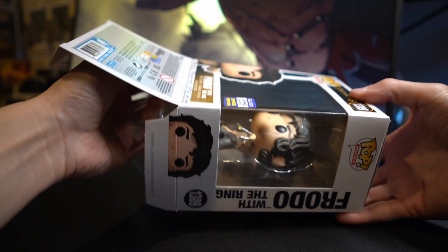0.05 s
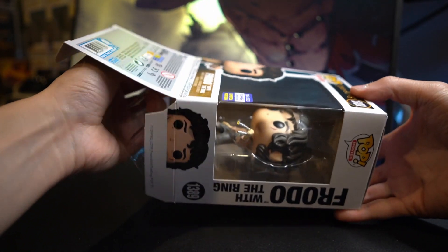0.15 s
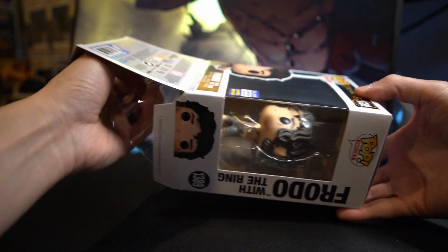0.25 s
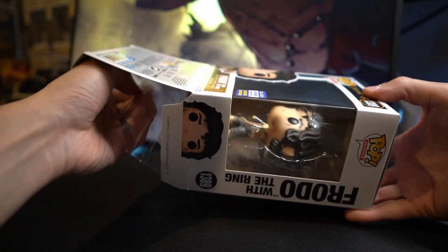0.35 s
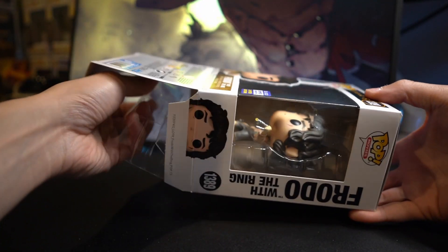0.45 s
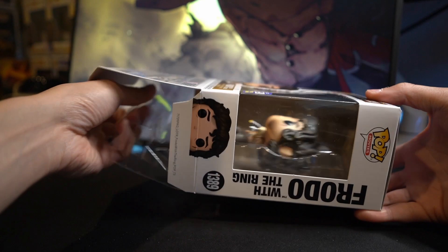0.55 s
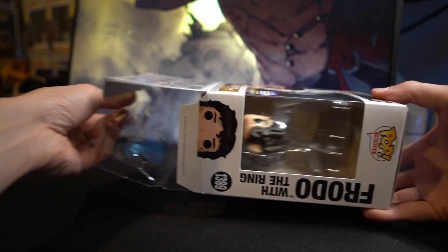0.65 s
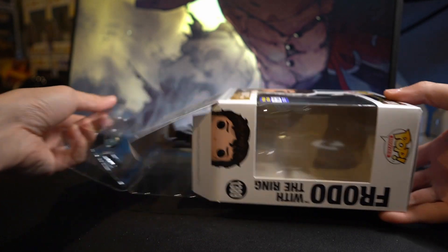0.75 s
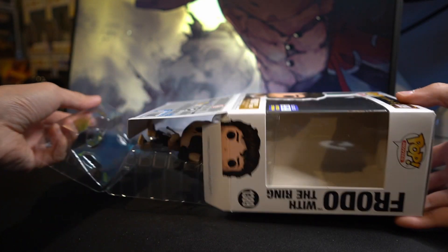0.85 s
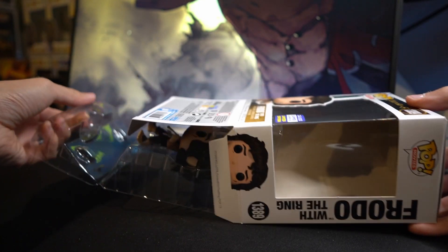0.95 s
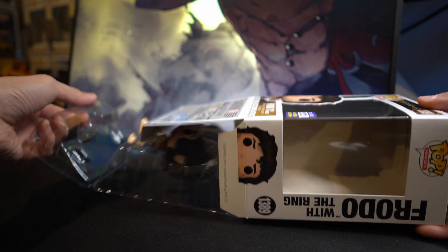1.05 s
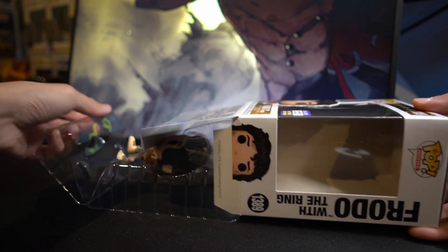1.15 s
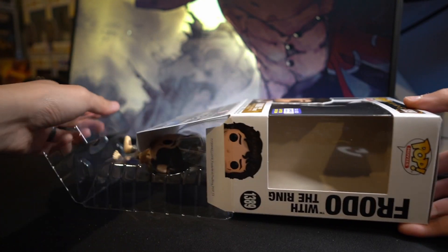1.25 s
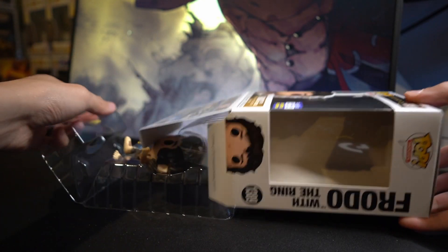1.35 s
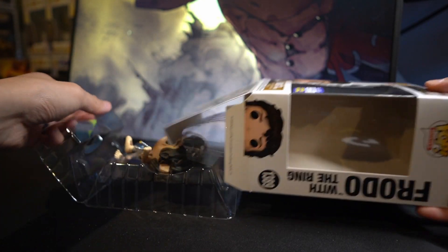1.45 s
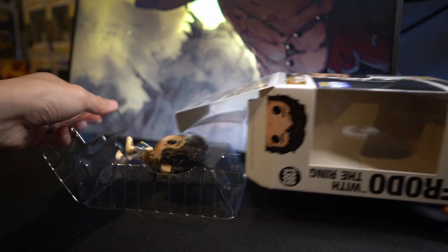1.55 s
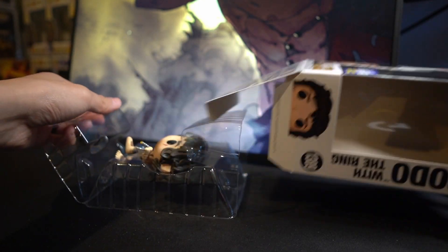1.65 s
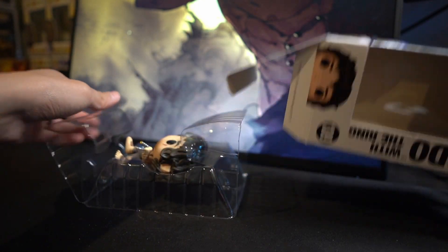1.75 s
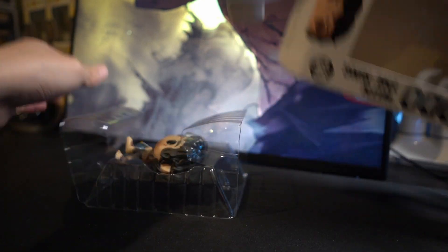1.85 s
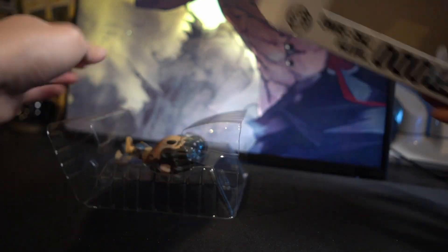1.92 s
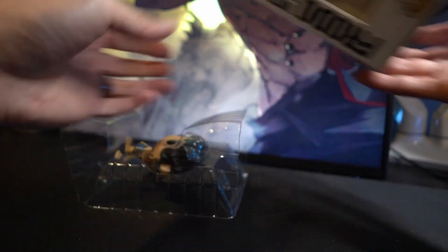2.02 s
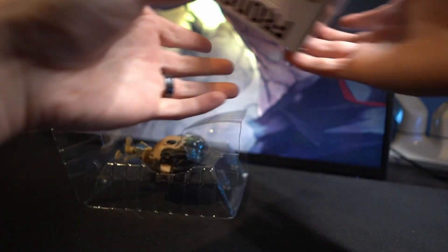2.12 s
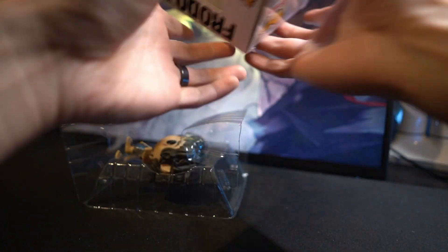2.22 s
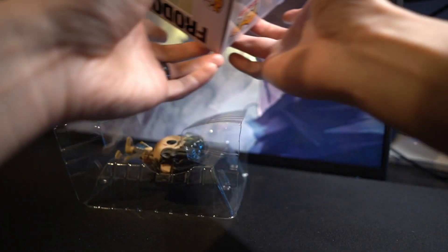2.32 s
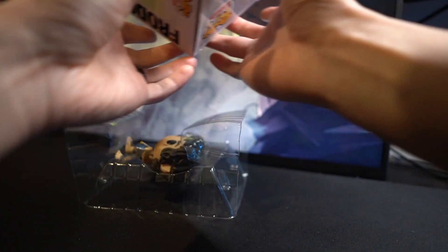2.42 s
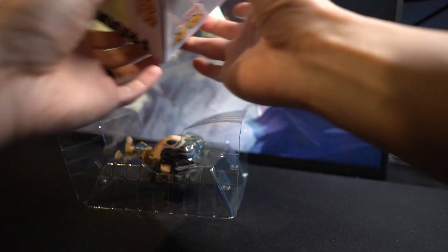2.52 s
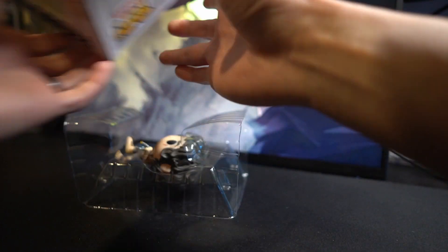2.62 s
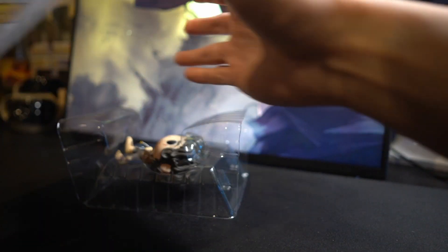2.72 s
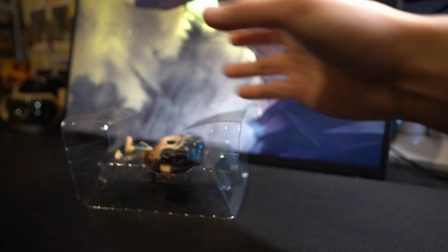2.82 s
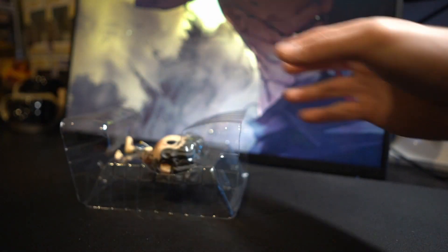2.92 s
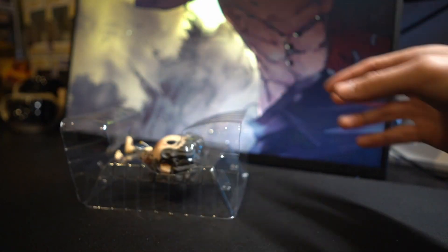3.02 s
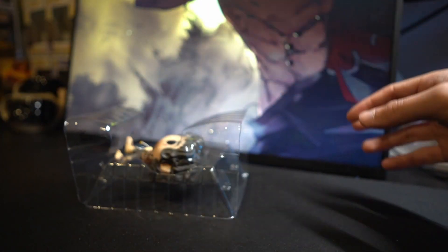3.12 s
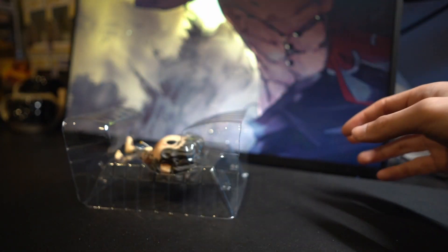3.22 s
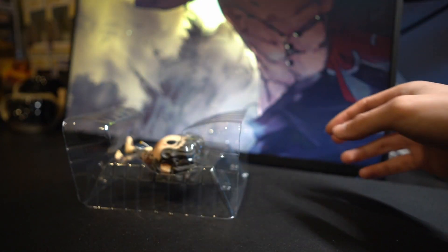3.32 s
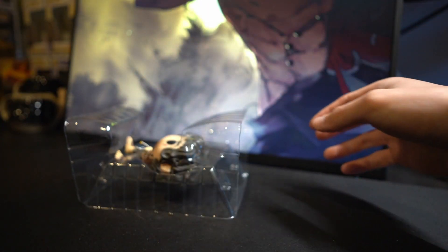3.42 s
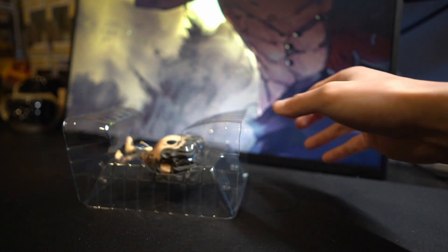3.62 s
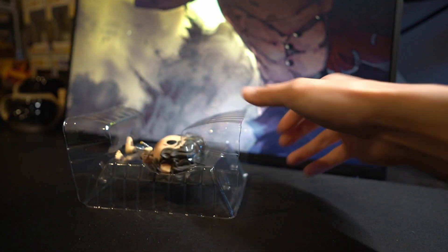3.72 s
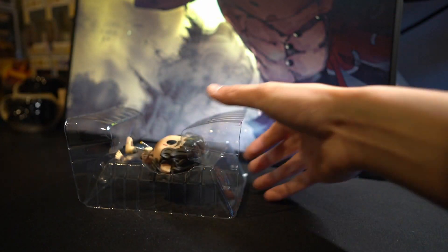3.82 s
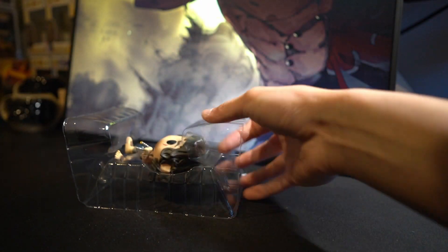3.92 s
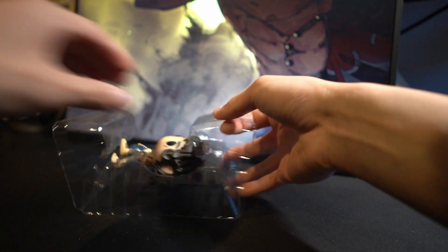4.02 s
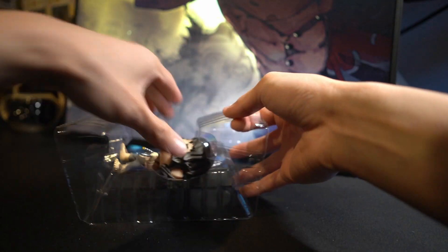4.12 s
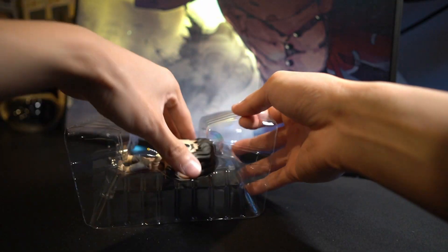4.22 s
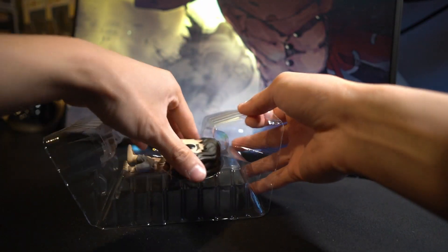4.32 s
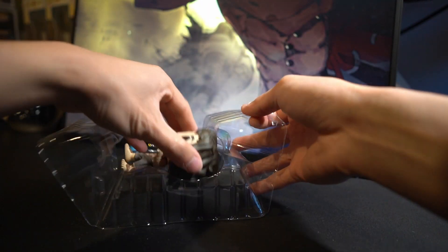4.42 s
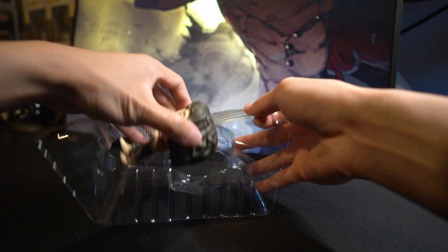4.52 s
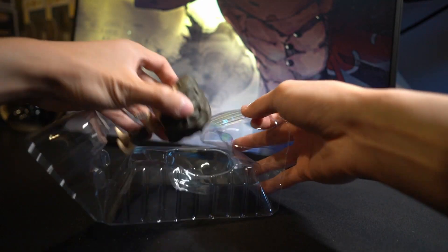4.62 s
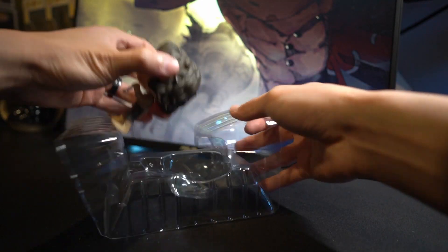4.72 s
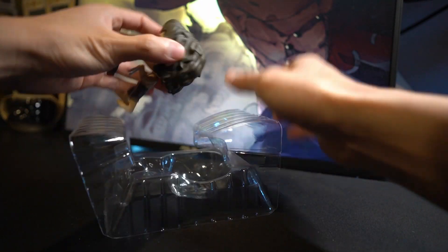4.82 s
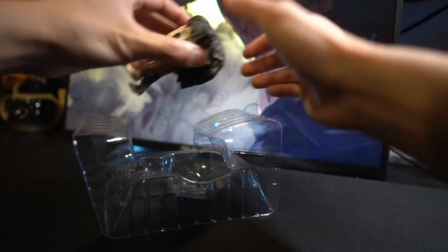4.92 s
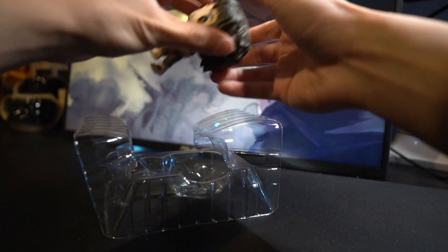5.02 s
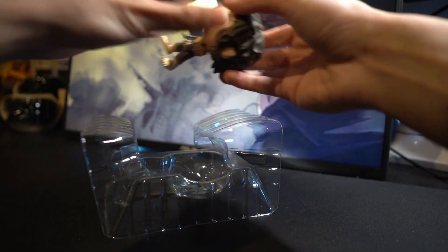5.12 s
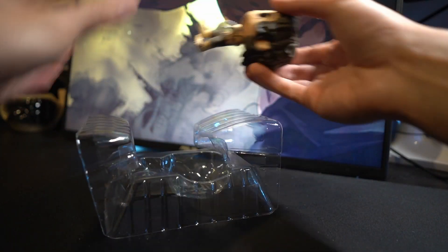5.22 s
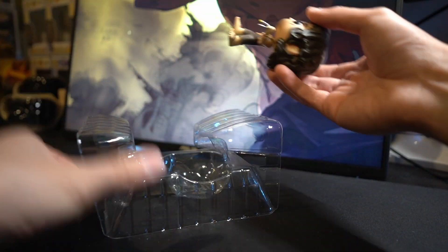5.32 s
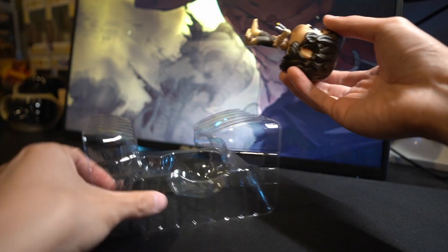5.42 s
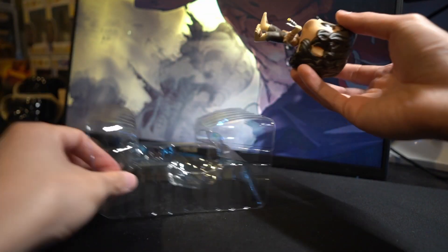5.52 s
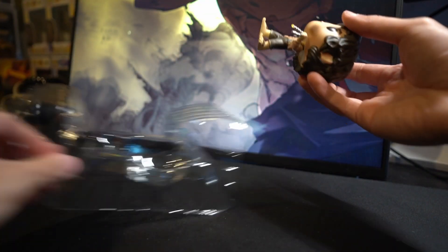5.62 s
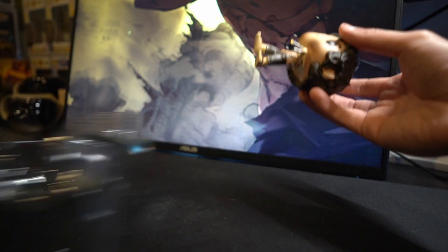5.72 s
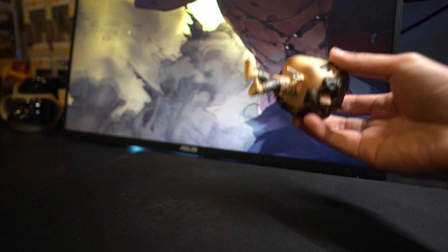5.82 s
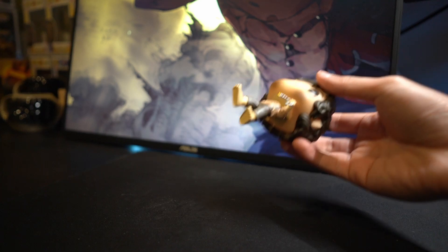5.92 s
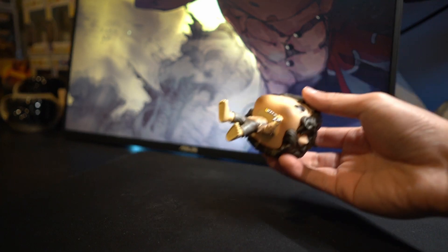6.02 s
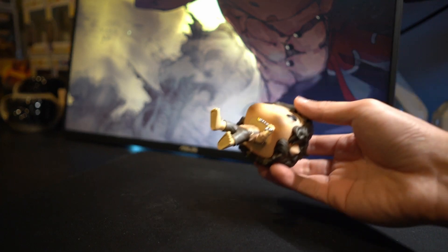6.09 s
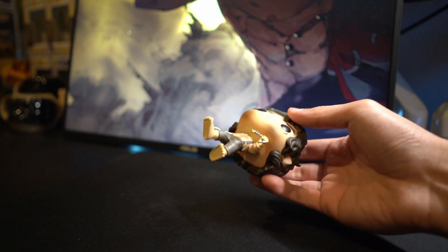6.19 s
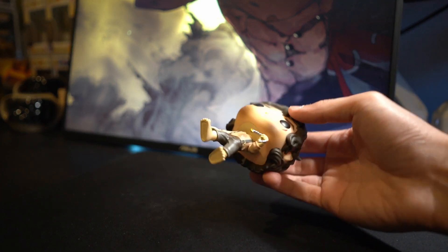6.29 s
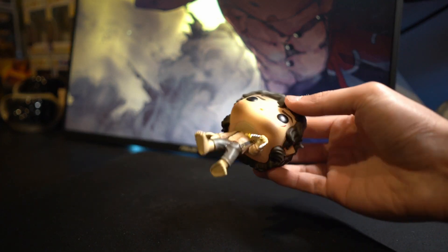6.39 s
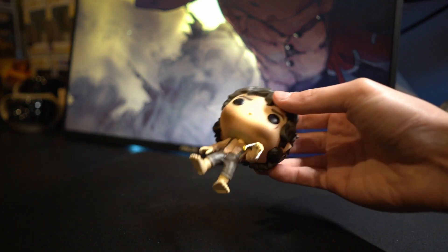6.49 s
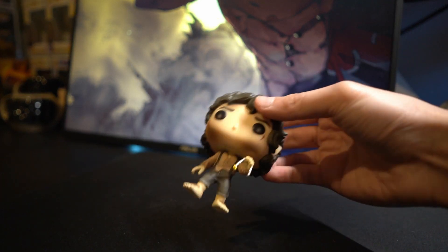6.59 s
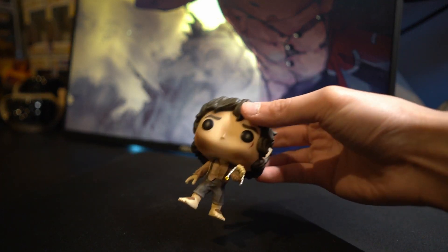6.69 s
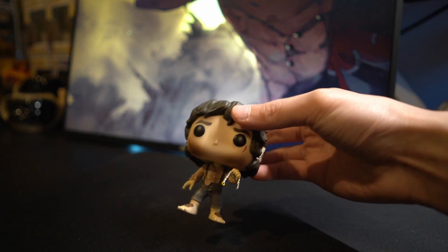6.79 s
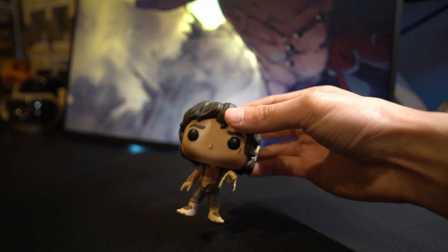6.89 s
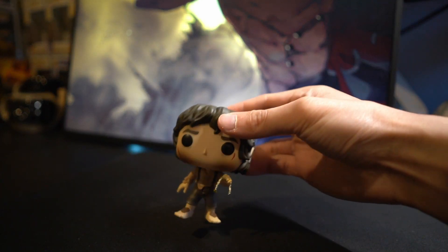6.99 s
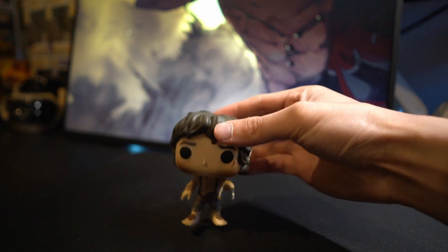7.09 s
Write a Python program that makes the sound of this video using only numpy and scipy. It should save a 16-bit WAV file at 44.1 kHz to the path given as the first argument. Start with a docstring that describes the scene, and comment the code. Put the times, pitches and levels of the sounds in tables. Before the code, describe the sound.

A thin plastic tray is pulled from a small cardboard box with sharp snaps, scraping and hollow knocks. Set on a desk, it rocks in double ticks that quicken and fade while the empty box is softly handled. Fingers squeeze the tray, crackling and popping it, remove a small figure, then the tray rocks again and is dragged off with a squeak. Near silence follows. Close microphone, left-sided, quiet small room.

```python
"""Plastic tray pulled out of a small box

A thin plastic tray is pulled out of a small cardboard box on a desk: it scrapes, snaps and crackles.
Left alone it rocks on its edges, ticking ever faster, while the hollow box is handled aside; then it is
squeezed, emptied and dragged away, and fingers turn the small figure it held. Clicks and rattles ring the
tray, box and desk; many tiny random slips make the rubbing. One close microphone, panned to the left.
"""
import sys
import numpy as np
from scipy import signal
from scipy.fft import rfft, irfft, next_fast_len
from scipy.io import wavfile

SR = 44100
rng = np.random.default_rng(int(sys.argv[2]) if len(sys.argv) > 2 else 0)


def put_to_file(sound):
    """Save the sound as 16-bit audio at rate SR, in the file named by the first command-line argument."""
    columns = np.atleast_2d(sound).T  # one column per channel
    safe = np.clip(columns, -1, 1)
    whole_steps = np.round(safe * 32767)
    wavfile.write(sys.argv[1], SR, whole_steps.astype(np.int16))


N = 315315   # samples in the scene

# All source levels are set ahead of the microphone gain. Levels of modes (the tones in which a thing
# rings) and of colours only weigh their rows against each other. Ring time is the time to fall by 60 dB.

# Tones of the tray walls. Each row: pitch in Hz, level in dB, ring time in seconds when struck.
TRAY_MODES = [(920, -4, .012), (1170, 0, .011), (1400, 0, .01), (1650, -2, .009), (1900, -3, .008),
              (2150, -3, .008), (2450, -2, .007), (2750, -4, .007), (3050, -3, .006), (3450, -1, .006),
              (3950, -1, .006), (4500, -5, .005)]
# Tones of the air and panels of the box with the tray inside. Each row: pitch in Hz, level in dB,
# ring time in seconds.
BOX_MODES = [(360, -23, .05), (330, -14.5, 0.11), (436, -9, 0.16), (522, -4.5, 0.04), (550, 4, 0.068),
             (627, -4.5, 0.09), (845, -15.5, 0.0033)]
# Tones of the desk top. Each row: pitch in Hz, level in dB, ring time in seconds when struck.
DESK_MODES = [(63.4, -14, 0.45), (112.66, 1.5, 0.12), (159, -5, 0.062), (272, -7, 0.11)]
# The tray rocks and two corners land almost together. Each row: start in seconds, first landing in dB,
# gap to the second in ms, second landing in dB.
ROCKING = [(1.875, -21.5, 5.4, -22.5), (2.0822, -23, 7, -25), (2.2789, -34, 5.54, -22),
           (2.462, -52.5, 9.1, -23.5), (2.6543, -23.5, 7.5, -46.5), (2.833, -29.5, 4.8, -32.5),
           (3.0019, -32.5, 8.8, -29.5), (3.1673, -30.5, 17, -43), (3.3144, -29.5, 6, -48),
           (3.4405, -47, 16.7, -30.5), (3.5983, -45, 8.4, -32.5), (3.7335, -35.5, 6, -52.5),
           (3.8674, -36.5, 6.4, -48), (4.998, -30, 5, -25), (5.1621, -31.5, 13, -33),
           (5.3152, -33.5, 3.8, -36)]

TRAY_OUT_S = 1.5   # from here on the tray is outside the box


def from_db(db):
    """Turn decibels into a gain."""
    return 10 ** (np.asarray(db) / 20)


def rms_one(x):
    """Scale to an average strength (rms) of 1."""
    return x / np.sqrt(np.mean(x ** 2) + 1e-20)


def in_time(rows):
    """Turn each column of a curve table into one value a sample."""
    s, *columns = np.transpose(rows)
    return [np.interp(np.arange(N) / SR, s, c) for c in columns]


def coloured(x, spectrum):
    """Filter to the given spectrum with minimum phase, so that nothing sounds early; rms 1."""
    size = next_fast_len(N + 8192)
    hz, db = np.transpose(spectrum)
    grid = np.maximum(np.fft.rfftfreq(4096, 1 / SR), 1)
    grid_db = np.interp(np.log(grid), np.log(hz), np.maximum(db, -70))
    cepstrum = irfft(np.log(from_db(grid_db)))
    # folding the second half onto the first gives minimum phase
    cepstrum[1:2048] *= 2
    cepstrum[2049:] = 0
    response = irfft(np.exp(rfft(cepstrum)))
    return rms_one(irfft(rfft(x, size) * rfft(response, size), size)[:N])


def drift(rate_hz):
    """Slow random wandering with rms 1, computed every 40 samples and joined by lines."""
    r = np.exp(-2 * np.pi * rate_hz * 40 / SR)
    noise = rng.standard_normal(N // 40 + 2002)
    slow = signal.lfilter([1], [1, -2 * r, r * r], noise)[2000:]   # skip the settling
    return np.interp(np.arange(N) / 40, np.arange(len(slow)), rms_one(slow))


def ring(force, hz, t60):
    """A resonance: a unit click sets a fading sine of about height 1 ringing."""
    r = from_db(-60 / (t60 * SR))
    w = 2 * np.pi * hz / SR
    return signal.lfilter([0, np.sin(w)], [1, -2 * r * np.cos(w), r * r], force + 1e-18)


def grains(per_s, spread_db, clump_db):
    """Random slips of uneven size and either sign, whose strength swells and sinks in clumps."""
    sizes = from_db(spread_db * np.minimum(rng.exponential(1, N), 5)) * rng.choice([-1, 1], N)
    happens = rng.random(N) < per_s / SR
    return sizes * happens * from_db(clump_db * drift(40))


def struck(times, peak_db, rattle_ms, modes, uneven_db, after, bend, tilt_db=None):
    """Each contact is a click and a rattle that swells and dies; grip shifts the modes and shares the energy."""
    length = 6000   # samples kept of each contact
    chance = rng.standard_normal((len(times), len(modes), 2))
    rattles = rng.standard_normal((len(times), length))
    # the rattle is a run of uneven lumps about a millisecond long
    lumps = np.repeat(rng.standard_normal((len(times), 120)), 50, axis=1)
    rattles = rattles * from_db(3.6 * lumps)
    out = np.zeros(N + length)
    t_ms = np.arange(length) / SR * 1000
    slope = np.linspace(-.5, .5, len(modes))   # lowest to highest mode
    for k, (s, db, ms) in enumerate(zip(times, peak_db, rattle_ms)):
        push = after * rattles[k] * np.exp(-t_ms / ms) * (1 - np.exp(-t_ms / 0.54))
        push[0] += .7   # the click
        tilt = 0 if tilt_db is None else tilt_db[k] * slope
        shares = from_db(uneven_db * chance[k, :, 0] + tilt)
        sound = np.zeros(length)
        for (hz, mode_db, t60), share, shift in zip(modes, shares, chance[k, :, 1]):
            sound += share * from_db(mode_db) * ring(push, hz * (1 + bend * shift), t60)
        at = round(s * SR)
        out[at:at + length] += from_db(db) * sound / np.max(np.abs(sound))
    return out[:N]


def cracks(times, level_db, fade_ms, low_hz, high_hz):
    """Very short bursts of noise that die exponentially, kept to one band of pitch."""
    length = 2000   # samples kept of each burst
    rattles = rng.standard_normal((len(times), length))
    out = np.zeros(N + length)
    t_ms = np.arange(length) / SR * 1000
    for s, db, ms, rattle in zip(times, level_db, fade_ms, rattles):
        at = round(s * SR)
        out[at:at + length] += from_db(db) * rattle * np.exp(-t_ms / ms)
    band = signal.butter(2, [low_hz, high_hz], "band", fs=SR, output="sos")
    return signal.sosfilt(band, out[:N])


def stroke_db(rows):
    """The pressure of one stroke, silent outside it."""
    s, db = np.transpose(rows)
    return np.interp(np.arange(N) / SR, s, db, left=-120, right=-120)


def pressure():
    """Pressure as friction level in dB: the strongest of all strokes, brushes and shivers at each moment."""
    # Hands rub the tray, one table a stroke. Each row: time in seconds, friction level in dB.
    pull = [(0.0, -33.5), (0.06, -50), (0.19, -63.5), (0.24, -30), (0.35, -41), (0.43, -59), (0.48, -40.5),
            (0.54, -51.5), (0.6, -36.5), (0.8, -29), (0.87, -35), (1.12, -33.5), (1.25, -38), (1.34, -51),
            (1.46, -32), (1.58, -29), (1.62, -57), (1.78, -64), (1.86, -94.5)]
    squeeze = [(3.9, -83), (3.97, -45.5), (4.05, -32.5), (4.16, -45.5), (4.3, -38.5), (4.36, -50),
               (4.44, -52.5), (4.59, -43.5), (4.66, -43.5), (4.72, -67), (4.75, -40.5), (4.84, -48.5),
               (4.93, -82)]
    grab = [(5.45, -83.5), (5.468, -28.5), (5.534, -27.5), (5.562, -54.5), (5.66, -56), (5.85, -65),
            (5.92, -87)]
    # Fingers briefly brush card, plastic or the figure. Each row: time of the peak in seconds,
    # peak friction level in dB, fade in dB per second.
    brush_rows = [(2.379, -68.5, 304), (2.594, -55.5, 300), (3.41, -66, 151), (3.487, -53.5, 298),
                  (6.21, -72, 20.5), (6.258, -52, 300), (6.349, -64.5, 200), (6.526, -53, 176),
                  (6.662, -65, 241.5), (6.845, -72.5, 255), (7.022, -70, 253)]
    rise = 3000   # dB per second
    shiver_db, shiver_fade = -26, 299.5   # rustle after a landing: dB against it, dB per second

    t = np.arange(N) / SR
    levels = [stroke_db(pull), stroke_db(squeeze), stroke_db(grab)]
    for s, db, fade in brush_rows:
        levels.append(db - np.where(t < s, rise * (s - t), fade * (t - s)))
    for s, first, _, second in ROCKING:
        shiver = max(first, second) + shiver_db - shiver_fade * (t - s)
        levels.append(np.where(t < s, -120, shiver))
    return np.max(levels, axis=0)


def scattered(level_db, count, over_db):
    """Random moments, more often where the pressure is high, with peaks that follow it."""
    chance = rng.random((count, 2))
    share = np.cumsum(np.sqrt(from_db(level_db)) * (level_db > -52))
    at = np.searchsorted(share, chance[:, 0] * share[-1])
    spread_db = 4.5 * np.log(chance[:, 1] + 0.046)
    return at / SR, level_db[at] + over_db + spread_db


def plastic(s, peak_db, ms, bright_db, body_db, tilt_db):
    """A wall buckles or lands: the tray rings, a bright crack goes with it and the box booms along."""
    walls = struck(s, peak_db, ms, TRAY_MODES, uneven_db=5.0, after=0.29, bend=0.083, tilt_db=tilt_db)
    body = struck(s, peak_db + body_db, 1.7 * ms, BOX_MODES, uneven_db=3.5, after=0.84, bend=0.051)
    soft = signal.butter(2, 6000, fs=SR, output="sos")   # contacts last a moment, which dulls the ring
    crack = cracks(s, peak_db + bright_db, 0.49 * ms, low_hz=5100, high_hz=9860)
    return signal.sosfilt(soft, walls + body) + crack


def tray_snaps(rub_db):
    """Tray walls buckle: loud snaps at set times, and small ones scattered where the tray is pressed."""
    # Each row: start in seconds, level of the walls in dB, bright crack in dB against it,
    # boom of the box in dB against it, rattle fade in ms, tilt towards the high modes in dB.
    snaps = [(0.0028, -9.5, -21.5, -14.5, 4.1, 1.95), (0.0434, 2.5, -20.5, -15, 8.7, 7.1),
             (0.2017, -24.5, -15, -4.5, 3.6, -0.8), (0.2349, -3.5, -11, -14, 1.6, 1.1),
             (0.2405, 1, -17.5, -14.5, 11.7, 0.1), (0.386, -5.5, -6.5, -15, 2.65, -1),
             (0.4608, -17, -16.5, -7, 7.1, -19), (0.556, -35, -30.5, 7, 4.5, -4.3),
             (0.5753, -20, -29, -18, 7.4, -6.5), (0.6402, -14, -11, -12, 6.8, 2),
             (0.6544, -16.5, -4, -8, 3.8, -4), (0.69, -17.5, -13, -5, 5.1, 11),
             (0.727, -19.5, -21.5, -14, 3.2, -33), (0.767, -18, -35, -17.5, 5.1, 8),
             (0.786, -15, -18, -12.5, 3.2, 0.1), (0.834, -17, -9, -9, 4.5, 1),
             (0.8643, -9.5, -12, -16, 4.2, 16.7), (1.0723, -14, -27, -5, 2.2, 2.5),
             (1.0936, -8, -12.5, -5.5, 3.9, -3.7), (1.109, -9.5, -12.5, -6, 5.4, 5.3),
             (1.1894, -23.5, -2, -6.5, 4.5, -3.2), (1.2429, -25.5, 1, -10.5, 4.9, -3),
             (1.3289, -30, -7.5, -11.5, 4.5, -11), (1.3568, -32, -14, -7, 6.2, -2.5),
             (1.5267, -31, -18.5, -8.5, 3.6, 6.2), (1.566, -4, -34, -9.5, 5.3, 0),
             (1.5849, -11.5, -1, -2.5, 2.8, -10.8), (1.712, -43.5, -6, -10, 5.2, -1.5),
             (3.042, -37.5, -29, -11, 6.9, 6), (3.4872, -40, -22, -11, 4.5, -5),
             (3.9167, -29.5, -11, -6.5, 11, 5), (3.9496, -35.5, -12, -16, 4, -14),
             (3.9869, -22, -13, -11, 9.4, 5), (4.0279, -14.5, -7.5, -7.5, 2.8, 11),
             (4.0562, -20.5, -17, -14, 3.1, -11), (4.0777, -20, -11, -7, 4.5, -15),
             (4.103, -20, -7, -14, 11.1, 4.5), (4.1266, -21.5, -8, -14, 4.5, 0.1),
             (4.15, -22.5, -12, -12, 7.8, -13), (4.2526, -24.5, -13, -14, 3.93, 6),
             (4.3181, -20, -18.5, -27, 5.3, -5), (4.3903, -26.5, -18.5, -24, 3.3, 15),
             (4.4118, -24, -22, -18, 4.1, 15), (4.4878, -13.5, -41, -21, 3.9, -9),
             (4.531, -15, -41, -18, 6.4, 7), (4.5517, -7.5, -19, -16, 6.4, 6),
             (4.5827, -21.5, -19, -5.5, 4, -19), (4.6132, -27.5, -27, -14, 4, -14),
             (4.6446, -32, -3, -5, 2.44, -3), (4.731, -26, -5.5, -7, 2.4, 7),
             (4.7599, -16, -24, -7, 4.9, -33), (4.8242, -14, -12, -13, 5.1, -7),
             (5.3783, -39.5, -34, -25, 5.1, -6), (5.4582, -24, -22, -19, 9.2, -8.7),
             (5.4928, -7.5, -24, -14, 3.9, -7), (5.5334, -15.5, -25, -15.5, 7.5, -14),
             (6.2579, -38.5, -31, -29, 6, -8), (6.5271, -45.5, -22, -25, 3.8, 18.5)]
    s, peak_db, bright_db, body_db, ms, tilt_db = np.transpose(snaps)
    small_s, small_db = scattered(rub_db, count=60, over_db=11)
    same = np.ones(len(small_s))
    loud = plastic(s, peak_db, ms, bright_db, body_db, tilt_db)
    return loud + plastic(small_s, small_db, 1.8 * same, -18, -16.5, 3.0 * same)


def friction_sound(slips):
    """Slips sound through a fixed colour and tray walls whose tones swell one by one as contact wanders."""
    # Colour of the rubbing inside the box. Each row: pitch in Hz, level in dB per Hz.
    boxed_colour = [(120, -40.5), (200, -22.5), (390, -5.5), (526, -3), (971, -16.5), (1100, -8.5),
                    (1570, -9.5), (2480, -10.5), (3970, -10.5), (6000, -28.5), (7800, -56), (13200, -120)]
    # Colour of the tray rubbed outside the box. Each row: pitch in Hz, level in dB per Hz.
    bare_colour = [(88, -46), (150, -17.5), (319, -9.5), (714, 2.5), (773, -9), (1160, 0.5), (2310, -9),
                   (2940, -10), (3450, -7), (7000, -25.5), (9100, -59.5), (15400, -120)]
    t = np.arange(N) / SR
    walls = sum(from_db(db + 2.5 * drift(4)) * ring(slips, hz, 2 * t60) for hz, db, t60 in TRAY_MODES)
    scrape = np.where(t < TRAY_OUT_S, coloured(slips, boxed_colour), coloured(slips, bare_colour))
    return scrape + 0.38 * rms_one(walls)


def rubbing(rub_db):
    """Dense stick-slip drives tray walls and box hollow, noise drives the desk; crinkles give the treble."""
    # Colour of the crinkles. Each row: pitch in Hz, level in dB per Hz.
    crinkle_colour = [(2350, -37.5), (4000, -4), (4530, -9.5), (9440, -15), (14100, -24.5), (15800, -24.5),
                      (16200, -36), (16500, -50)]
    # Dull handling noise in box and desk. Each row: time in seconds, level in dB before each share below.
    handling = [(0.0, -50.5), (0.1, -45.5), (0.52, -52.5), (0.96, -45), (1.55, -47.5), (1.67, -52.5),
                (2.25, -60), (2.55, -51), (2.95, -60.5), (3.96, -56.5), (4.16, -41), (4.34, -52),
                (4.76, -46.5), (5.2, -55), (5.38, -59), (5.57, -41), (5.87, -60), (7.15, -75.5)]
    # Brightness of the rubbing. Each row: time in seconds, dB added to the crinkles.
    brightness = [(0.0, -6), (0.3, -2), (0.42, -5), (0.7, 1.5), (0.98, -5.5), (1.13, -1), (1.3, -4),
                  (1.5, -1.5), (1.7, -1.5), (2.3, -5.5), (3.0, -10), (3.6, -6), (4.0, -1.5), (4.15, -1.5),
                  (4.3, -7), (4.45, -1), (4.6, -5), (4.75, -11), (4.85, 2), (5.5, -4), (6.3, -9.5),
                  (6.55, -5)]
    handling_box_db, handling_desk_db, handling_rustle_db = -12, -4, -21
    box_put_down_s, less_hollow_s = 3.9, 4.4
    mean_rub_db, crinkle_follows = -40, 0.96   # crinkles take this share of the friction's swing

    t = np.arange(N) / SR
    handling_db, = in_time(handling)
    added_db, = in_time(brightness)
    # how far the hollow sounds along, against friction; later in the squeeze it sounds along less
    box_db = np.where(t < TRAY_OUT_S, -6, -1 - 11 * (t > less_hollow_s))
    crinkle_db = mean_rub_db - 4.5 + crinkle_follows * (rub_db - mean_rub_db) + added_db

    slips = grains(20000, spread_db=3.0, clump_db=2.6)
    crinkle = coloured(grains(1500, spread_db=6.0, clump_db=4.0) + 1.5 * slips, crinkle_colour)
    hollow = rms_one(sum(from_db(db) * ring(slips * from_db(5.0 * drift(25)), hz, t60)
                         for hz, db, t60 in BOX_MODES))
    noise = rng.standard_normal(N)
    desk = rms_one(sum(from_db(db) * ring(noise, hz, 0.17 * t60) for hz, db, t60 in DESK_MODES))
    desk = desk * from_db(3.0 * drift(2.7))

    friction_gain = from_db(rub_db) + from_db(handling_db + handling_rustle_db)
    handled_box = from_db(handling_db + handling_box_db) * (t < box_put_down_s)
    hollow_gain = from_db(rub_db + box_db) + handled_box
    desk_gain = from_db(rub_db - 22.5) + from_db(handling_db + handling_desk_db)
    return (friction_gain * friction_sound(slips) + from_db(crinkle_db) * crinkle
            + hollow_gain * hollow + desk_gain * desk)


def tray_ticks():
    """The tray rocks on its edges: each rock ends in two light landings that ring it."""
    s, first_db, gap_ms, second_db = np.transpose(ROCKING)
    s = np.r_[s, s + gap_ms / 1000]
    peak_db = np.r_[first_db, second_db]
    same = np.ones(len(s))
    return plastic(s, peak_db, 2.06 * same, bright_db=-7, body_db=-13.5, tilt_db=4 * same)


def tray_crackles(rub_db):
    """Small creases pop with almost no body: short noise bursts, some set and some scattered."""
    # Thin crackles, loud and faint, during and just after the squeeze.
    # Each row: start in seconds, level in dB.
    crackles = [(4.2297, -42), (4.2616, -35), (4.2698, -33), (4.279, -33), (4.305, -34.5), (4.3304, -36),
                (4.3613, -39), (4.3838, -38), (4.391, -33.5), (4.402, -32), (4.4249, -33), (4.4333, -31.5),
                (4.4695, -39), (4.4826, -29.5), (4.5029, -45), (4.5107, -25.5), (4.5728, -30.5),
                (4.586, -34), (4.628, -38), (4.6624, -39), (4.6818, -40), (4.816, -34), (4.9003, -58),
                (4.9253, -47), (5.0194, -41), (5.086, -53.5)]
    s, level_db = np.transpose(crackles)
    first, last = round(1.5 * SR), round(6.6 * SR)   # span of the scattered ones
    small_s, small_db = scattered(rub_db[first:last], count=30, over_db=2)
    s = np.r_[s, small_s + first / SR]
    level_db = np.r_[level_db, small_db]
    return cracks(s, level_db, np.full(len(s), 1.2), low_hz=1700, high_hz=15800)


def box_knocks():
    """Soft contacts sound the hollow of the box, with a dry tap on the card on top."""
    # Fingers and edges on the hollow box. Each row: start in seconds, level in dB.
    knocks = [(0.615, -30), (0.639, -18.5), (0.685, -17.5), (0.732, -19.5), (0.837, -19.5), (0.886, -37),
              (0.923, -24), (1.022, -14.5), (1.096, -7.5), (1.176, -13.5), (1.249, -24.5), (1.442, -22),
              (1.499, -34), (1.571, -8.5), (2.269, -50.5), (2.3091, -31.5), (2.383, -49), (2.46, -47),
              (2.559, -29.5), (2.5948, -45), (2.6976, -30), (2.746, -42), (2.815, -47), (3.41, -46),
              (3.781, -52), (3.042, -48), (3.133, -42), (3.225, -35.5), (3.4885, -49), (3.534, -40.5),
              (3.6988, -40)]
    s, peak_db = np.transpose(knocks)
    out = cracks(s, peak_db, np.full(len(s), 6.0), low_hz=796, high_hz=2200)
    # the empty box, gripped, sounds higher and shorter
    for these, pitch, lasts in [(s < TRAY_OUT_S, 1, 1), (s >= TRAY_OUT_S, 1.17, .6)]:
        modes = [(hz * pitch, db, t60 * lasts) for hz, db, t60 in BOX_MODES]
        fade_ms = np.full(sum(these), 4.0)
        out = out + struck(s[these], peak_db[these], fade_ms, modes, uneven_db=4.0, after=0.19, bend=.05)
    return out


def desk_bumps():
    """The desk is bumped: its low tones ring as thuds, and a noise burst gives a dull pat on the mat."""
    # Each row: start in seconds, thud level in dB, pat level in dB.
    bumps = [(0.046, -34.5, -29), (0.234, -22, -19), (0.47, -43, -44), (1.081, -24, -40), (1.167, -24, -14),
             (1.569, -25, -29), (1.901, -36, -54), (2.291, -42, -48), (2.609, -36.5, -55),
             (4.028, -32, -36), (4.122, -37, -41), (4.558, -30, -30), (4.753, -28, -17),
             (4.824, -32.5, -22), (5.377, -29.5, -44), (5.476, -38, -40), (6.029, -61.5, -48),
             (6.305, -60, -28)]
    s, thud_db, pat_db = np.transpose(bumps)
    thud = struck(s, thud_db, np.full(len(s), 1.5), DESK_MODES, uneven_db=2.5, after=0.033, bend=0.057)
    return thud + cracks(s, pat_db, np.full(len(s), 20.0), low_hz=130, high_hz=647)


def drag():
    """The tray dragged over the mat: smooth hiss on cloth, and rough slip tones that climb as it lifts off."""
    # Each row: time in seconds, squeak pitch in Hz, squeak level in dB, hiss level in dB.
    path = [(5.54, 1345, -59, -50), (5.61, 1387, -38, -42.5), (5.66, 1405, -71, -48),
            (5.73, 1650, -54, -43), (5.8, 2153, -51.5, -49), (5.825, 2260, -47, -49.5),
            (5.855, 2504, -46, -52.5), (5.88, 2480, -82, -88)]
    # Colour of the hiss. Each row: pitch in Hz, level in dB per Hz.
    hiss_colour = [(180, -66), (300, -16.5), (596, -8), (1380, -3), (2610, -16), (3300, -4), (4850, -12.5),
                   (13700, -17.5), (15700, -20), (16500, -37)]
    hz, squeak_db, hiss_db = in_time(path)
    t = np.arange(N) / SR
    phase = 2 * np.pi * np.cumsum(hz * (1 + 0.0198 * drift(157.0))) / SR
    # pitch ratio and level in dB of each slip tone
    parts = [(1, 0), (.5, -5), (.68, -3), (1.3, -5), (1.6, -5), (1.97, -8)]
    tones = sum(from_db(db) * drift(70) * np.sin(ratio * phase) for ratio, db in parts)
    hiss = coloured(rng.standard_normal(N), hiss_colour) * from_db(1.5 * drift(41))
    sounding = (t > path[0][0]) & (t < path[-1][0])
    return sounding * (from_db(squeak_db) * tones + from_db(hiss_db) * hiss)


def chirps():
    """Brief chirps of rubbed plastic: a smooth panel slips for a moment and sings."""
    # Each row: start in seconds, peak level in dB.
    slip_rows = [(3.043, -44), (3.488, -45), (3.51, -55)]
    # Tones of the panel. Each row: pitch in Hz, level in dB, ring time in seconds.
    film_modes = [(2120, -2, .05), (2750, -5, 0.037), (3900, -8, .03), (5000, -9, .03)]
    s, db = np.transpose(slip_rows)
    return struck(s, db, np.full(len(s), 12.0), film_modes, uneven_db=3.0, after=.5, bend=.01)


def jingle():
    """A small metal part jingles briefly: faint clicks ring its high tones."""
    # Each row: start in seconds, peak level in dB.
    hits = [(3.237, -67), (3.255, -57), (3.276, -68), (3.29, -66)]
    # Tones of the metal. Each row: pitch in Hz, level in dB, ring time in seconds.
    metal_modes = [(7000, -21, .08), (7760, -7, .12), (8310, -7, .08), (11500, -11, .06),
                   (15000, -10, 0.065)]
    s, db = np.transpose(hits)
    return struck(s, db, np.full(len(s), 1.5), metal_modes, uneven_db=1.5, after=.2, bend=.002)


def room_air():
    """The quiet room's steady background: noise with a fixed colour."""
    # Each row: pitch in Hz, level in dB per Hz.
    air_colour = [(15, -38.5), (25, -5), (70, 0), (258, -4), (378, -10.5), (616, -11), (706, -20),
                  (926, -18.5), (1830, -34.5), (4120, -27), (4850, -32.5), (15200, -39), (16500, -53.5)]
    return from_db(-67) * coloured(rng.standard_normal(N), air_colour)


def room_echo(x):
    """Reflections as a dense noise tail that dies exponentially and is dull at the top."""
    t60_s, wall_cut_hz = 0.2, 2200
    t = np.arange(round(.5 * SR)) / SR
    tail = rng.standard_normal(len(t)) * from_db(-60 * t / t60_s) * (t > .005)
    tail = signal.lfilter([1], [1, -np.exp(-2 * np.pi * wall_cut_hz / SR)], tail)
    return signal.fftconvolve(x, tail / np.sqrt(np.sum(tail ** 2)))[:N]


def scene():
    """All sources reach one microphone, which sits left of centre in the mix."""
    mic_gain_db, room_db, right_db = 4.5, -16.5, -9   # right_db: right channel against the left
    rub_db = pressure()
    tray = tray_snaps(rub_db) + rubbing(rub_db) + tray_ticks() + tray_crackles(rub_db)
    near = tray + box_knocks() + desk_bumps() + drag() + chirps() + jingle()
    mono = from_db(mic_gain_db) * (near + from_db(room_db) * room_echo(near) + room_air())
    hiss = from_db(-102.5) * rng.standard_normal((2, N))   # each channel's own electronics
    return mono * from_db([[0], [right_db]]) + hiss


def record(dry):
    """The mic rolls off deep bass, one stage rounds the loudest peaks of both sides alike, the top is cut."""
    bass_cut = signal.butter(3, 45, "high", fs=SR, output="sos")
    top_cut = signal.cheby2(16, 95, 16850, fs=SR, output="sos")
    mic = signal.sosfilt(bass_cut, dry)
    drive = np.abs(mic[0]) / .9 + 1e-9   # the left side sets the rounding for both
    return signal.sosfilt(top_cut, mic * np.tanh(drive) / drive)


dry = scene()
out = record(dry)
put_to_file(out)
```